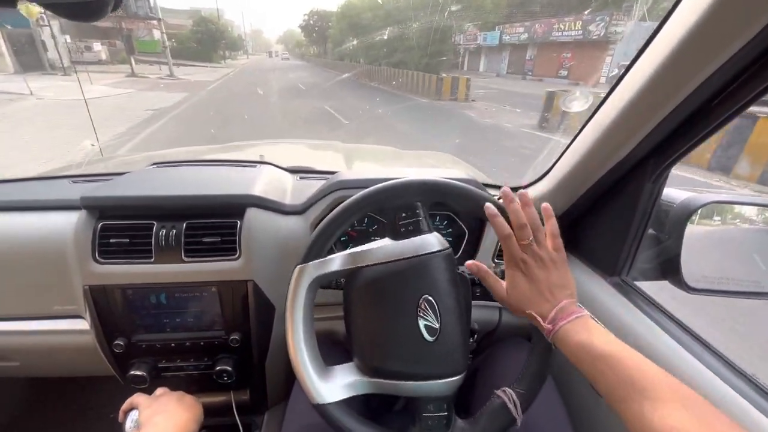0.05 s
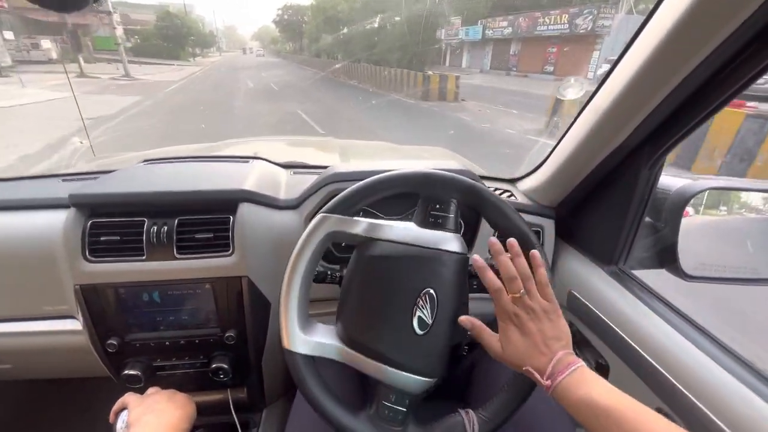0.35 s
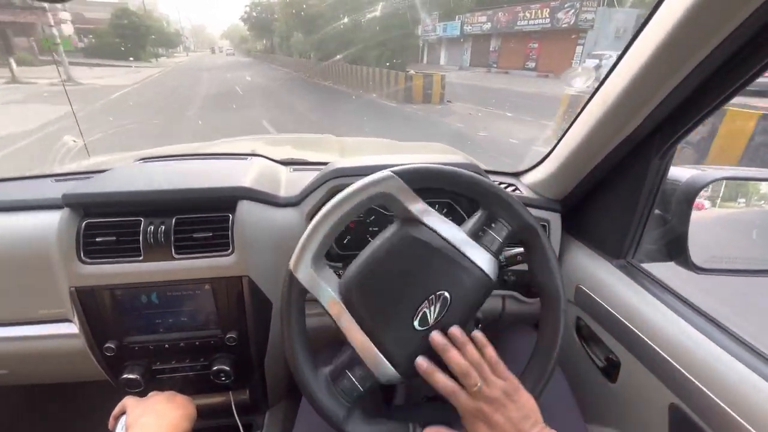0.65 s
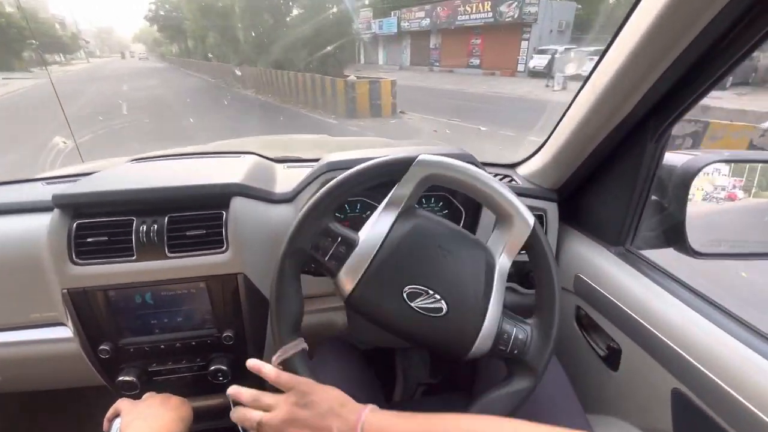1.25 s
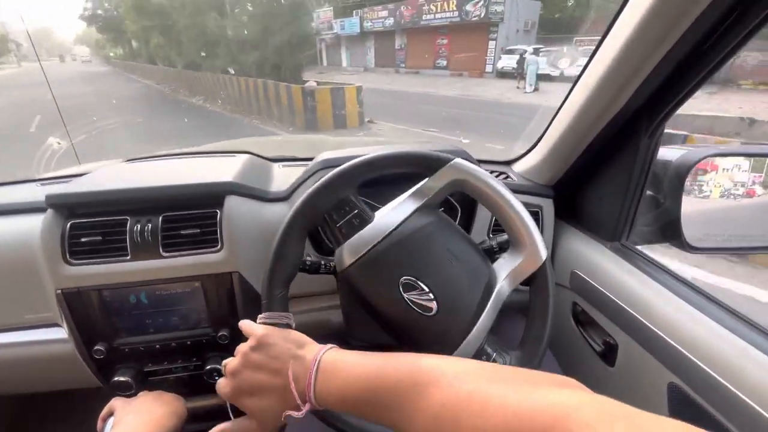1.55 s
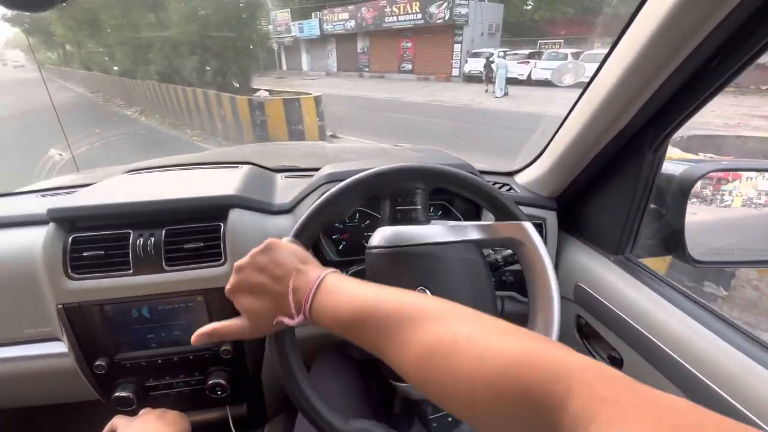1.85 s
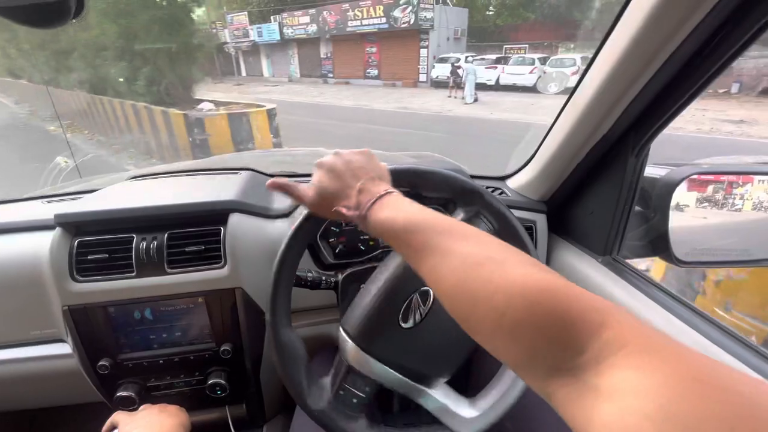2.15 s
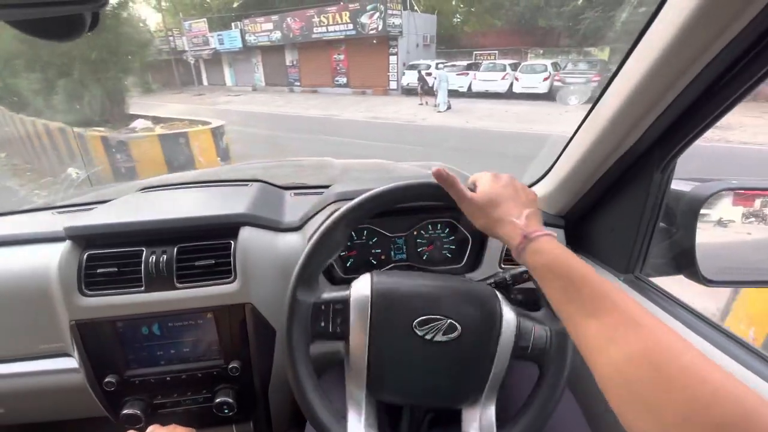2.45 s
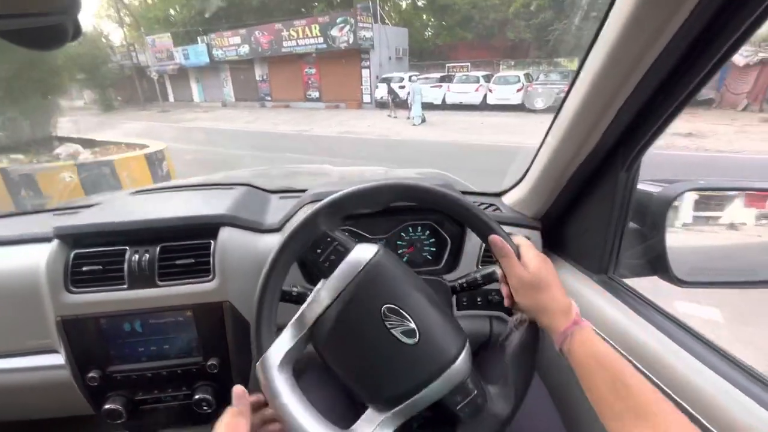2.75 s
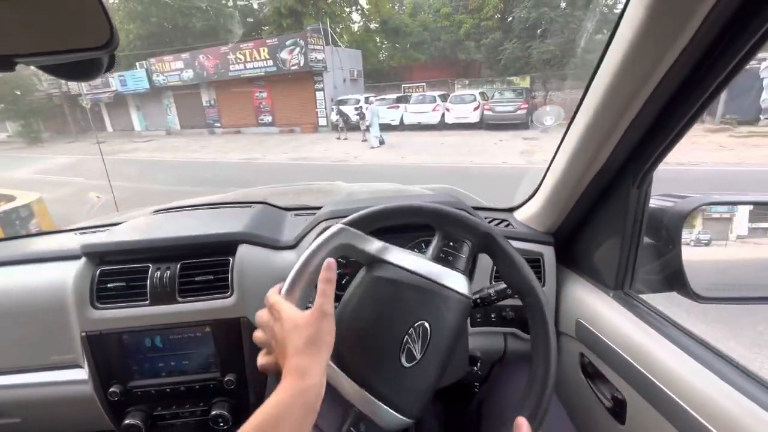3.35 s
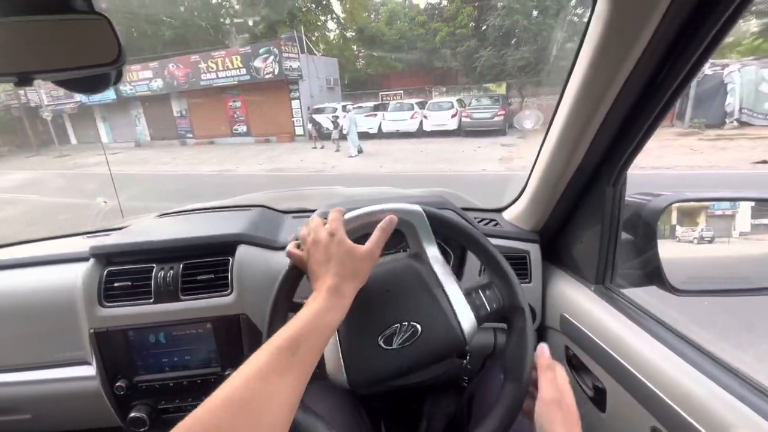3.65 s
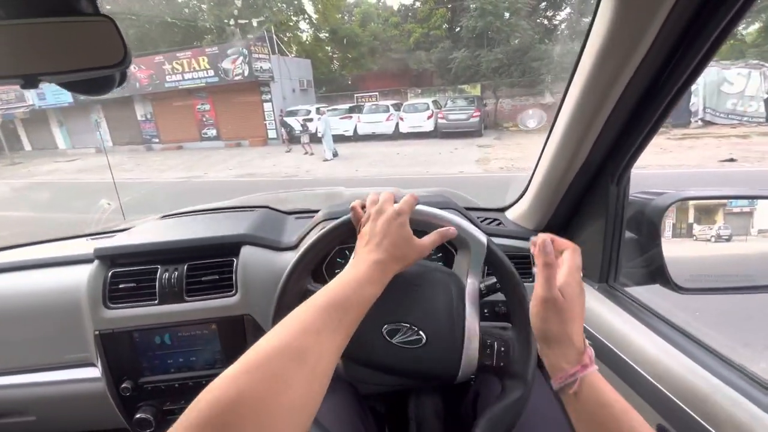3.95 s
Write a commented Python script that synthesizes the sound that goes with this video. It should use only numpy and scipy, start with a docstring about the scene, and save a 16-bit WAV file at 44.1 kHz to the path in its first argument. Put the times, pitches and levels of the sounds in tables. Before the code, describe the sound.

Inside a slowing car, the engine's deep hum drops in pitch and settles near idle while the road rumbles on. A few clicks, dull knocks and faint hand rubs come from the steering wheel, over a soft air hiss.

```python
"""An engine booms, heard from inside a car that slows for a turn. It sinks to idle and picks up slightly.
Its firing makes a stack of tones that ring in the cabin, over the rumble and roar of the road.
Palms rub on the steering wheel, something hard clicks against it, and a few soft knocks ring the trim.
Behind it all, air hisses on the right and a faint whirr swells through the turn."""
import sys
import numpy as np
from scipy import signal
from scipy.fft import rfft, irfft
from scipy.io import wavfile

SR = 44100
rng = np.random.default_rng(int(sys.argv[2]) if len(sys.argv) > 2 else 0)


def dump_mix(stems):
    """Bounce the given channels to the path in sys.argv[1] as a 16-bit WAV at rate SR."""
    frames = np.atleast_2d(stems).T  # one column per channel
    limited = np.clip(frames, -1, 1)  # hard clip at full scale
    pcm = np.round(limited * 32767).astype(np.int16)
    wavfile.write(sys.argv[1], SR, pcm)


N = 176400
T, HZ = np.arange(N) / SR, np.arange(N // 2 + 1) * SR / N
CUTOFF_HZ = 15800

# Engine speed. Each row: time in seconds, firings per second.
FIRING_RATE = [(0, 63.05), (.27, 63.24), (.52, 62.04), (.68, 58.88), (.8, 54.4), (.95, 48.54), (1.1, 42.4),
               (1.23, 38.44), (1.5, 35.38), (1.75, 29.44), (1.95, 26.51), (2.5, 26.53), (2.75, 29.32),
               (3.1, 29.22), (3.5, 28.97), (3.7, 27.86), (4, 28.37)]
# Loudness of the low boom, the boom an octave up, and the rest. Each row: time in seconds, level in dB.
LOW_BOOM = [(0, -32.5), (.14, -23.5), (.28, -30), (.36, -24.5), (.44, -27), (.54, -22.5), (.68, -22.5),
            (.8, -29.5), (.88, -35.5), (.97, -25), (1.15, -39), (1.28, -42), (1.5, -43), (2.9, -50),
            (3.05, -42), (3.5, -62), (4, -72)]
HIGH_BOOM = [(0, -36), (.11, -33), (.33, -34), (.45, -55.5), (.53, -30.5), (.61, -52), (.73, -30.5),
             (.9, -39.5), (1.1, -59), (1.57, -38), (1.8, -53), (1.97, -31.5), (2.3, -40), (2.5, -38.5),
             (2.82, -32), (3.15, -37), (3.5, -34.5), (4, -36.5)]
OTHER_TONES = [(0, -38), (.2, -37.5), (.45, -34), (.75, -43), (1.0, -40.5), (1.23, -38.5), (1.5, -47.5),
               (1.8, -45), (2.3, -41.5), (2.7, -43.5), (3.1, -45), (3.38, -38.5), (4, -42)]
# How the cabin colours those other tones. Each row: pitch in Hz, boost in dB.
CABIN_BOOST = [(30, -21.5), (60, -2), (86, 0.5), (98, 0.5), (113, 4), (130, 3), (150, -11), (180, -4),
               (200, -14), (218, 1.5), (235, -14), (252, -2.5), (280, -25.5), (380, -18.5), (500, -22.5)]

def engine(firing_hz, phase):
    """Firing cylinders make two booms, and weaker tones that glide through the cabin's resonances."""
    out, others_db = 0, in_time(OTHER_TONES)
    booms = {1: LOW_BOOM, 2: HIGH_BOOM}
    octave_db, halfway_db = -4, -7.5
    for multiple in np.arange(1, 21) / 2:
        if multiple in booms:
            db = in_time(booms[multiple]) + 2 * drift(32)
        else:
            db = others_db + at_hz(CABIN_BOOST, multiple * firing_hz) + 4.5 * drift(5.3)
            db += octave_db * np.log2(multiple)
            db += halfway_db * (multiple % 1 > 0)  # uneven cylinders give the in-between tones
        tone = np.sqrt(2) * np.sin(multiple * phase + rng.uniform(0, 2 * np.pi))
        out = out + from_db(db) * tone
    return out * pan(-1.1)


# The rumble's loudness. Each row: time in seconds, level in dB.
RUMBLE_LOUDNESS = [(0, -34), (.5, -39.5), (.85, -36), (1.0, -31.5), (1.22, -37.5), (1.42, -30),
                   (1.65, -36.5), (1.8, -40), (2.08, -36), (2.3, -34), (2.6, -45), (3.05, -35.5),
                   (3.3, -42), (4, -36.5)]
# Its colour. Each row: pitch in Hz, relative level in dB.
RUMBLE_COLOUR = [(10, -37), (19, -43.5), (27, -17), (40, 8.5), (54, 15), (78, 20), (95, 4.5), (110, 11),
                 (135, 7), (170, -20.5), (300, -62.5)]

def road_rumble():
    """The rolling wheels make a deep rumble."""
    return cabin_noise(RUMBLE_COLOUR, pan_db=-1.6) * from_db(in_time(RUMBLE_LOUDNESS))


# Hard taps. Each row: start in seconds, level in dB, brightest pitch in Hz, sharpness (Q), pan in dB.
WHEEL_CLICKS = [(.184, -49, 7400, 5, -8), (0.9155, -24.5, 8150, 3, -2.5), (0.9163, -29, 4140, 4, -10),
                (.9198, -30.5, 6100, 2.1, -11), (1.6925, -37.5, 7004, 14, -10), (1.693, -41, 4242, 5, -12),
                (2.3675, -38.5, 14570, 2.77, -1), (2.3666, -34, 2250, 2.4, -3),
                (3.561, -17.5, 1187, 10.5, -2), (3.575, -44.5, 5864, 1.85, -5), (3.674, -49, 4200, 5.6, -2),
                (3.9189, -34, 2530, 6, -8)]
# Their ring. Each row: pitch in Hz, level in dB, fade time in seconds.
RING_TONES = [(2859, -17, .05), (3520, -4, .035), (3750, -5, .035), (4194, -3, .055), (4480, -3, .055),
              (5200, -7, .035), (5900, -5, .05), (6400, -6, .04), (6595, -5, .045), (7181, -11, .055),
              (8150, -3, .05), (8600, -8, .055)]
# The colour of their noise. Each row: pitch in Hz, boost in dB.
SPRAY_COLOUR = [(300, 2), (1500, -5), (2700, -11), (3600, -12), (5300, -17), (8800, -18.5), (10000, -17.5),
                (16000, -20)]

def clicks():
    """Something hard hits the wheel: a crack, a short ring and a spray of cabin echoes."""
    out, size = np.zeros((2, N)), SR // 5
    t, bin_hz = T[:size], np.arange(size // 2 + 1) * SR / size
    colour = from_db(at_hz(SPRAY_COLOUR, bin_hz))
    crack, echoes = from_db(5) * dying(t, .016), dying(t, .1)
    for start, db, bright_hz, q, pan_db in WHEEL_CLICKS:
        spray = irfft(rfft(rng.standard_normal((2, size))) * colour, size)
        hit = spray * (crack + echoes)
        for hz, ring_db, fade_s in RING_TONES:
            tone = np.sin(2 * np.pi * (hz * t + rng.random((2, 1))))
            hit += from_db(ring_db - 13.5) * dying(t, fade_s) * tone
        top_hz = min(1.9 * bright_hz, CUTOFF_HZ)
        hit = signal.lfilter(*signal.butter(2, top_hz, fs=SR), hit)
        peak = signal.lfilter(*signal.iirpeak(bright_hz, q, fs=SR), hit)
        add(out, start, (peak + from_db(-18.5) * hit) * from_db(db) * pan(pan_db))
    return out


# Soft blows. Each row: start in seconds, level in dB, boost of the upper tones in dB, pitch factor.
SOFT_KNOCKS = [(0.921, -49, -15, 1), (2.886, -29.5, -6, 1.03), (3.5257, -22.5, -2, 0.98),
               (3.5594, -29, -5, 1.056), (3.566, -23, -13, 0.917), (3.807, -31.5, 5, 1)]
# The trim's ring. Each row: pitch in Hz, level in dB, fade time in seconds.
TRIM_TONES = [(151, -10.5, 0.048), (184.5, -1, 0.11), (249, -6, 0.11), (385, -18, 0.077), (616, -27, .04),
              (820, -20, 0.036), (1127, -34, 0.031), (1280, -17, 0.045)]

def knocks():
    """Dull blows make the cabin trim ring briefly."""
    out, t = np.zeros((2, N)), T[:SR // 4]
    attack, upper_hz = 1 - dying(t, .0041), 600
    for start, db, upper_db, pitch in SOFT_KNOCKS:
        for hz, tone_db, fade_s in TRIM_TONES:
            side_shift = np.array([[.5], [-.5]]) * at_hz(LEFT_LEAD, hz)
            tone = np.sin(2 * np.pi * pitch * hz * t + side_shift)
            gain = from_db(db + tone_db + upper_db * (hz > upper_hz))
            add(out, start, gain * tone * attack * dying(t, fade_s))
    return out


# Loudness of the drone and the roar. Each row: time in seconds, level in dB.
DRONE_LOUDNESS = [(0, -41), (.25, -43.5), (.47, -39), (.7, -42.5), (1.0, -38.5), (1.17, -46), (1.35, -41.5),
                  (1.7, -42), (2.1, -41), (2.35, -43), (2.85, -42), (3.2, -44), (3.7, -42.5), (4, -43.5)]
ROAR_LOUDNESS = [(0, -50.5), (.25, -49.5), (.45, -47.5), (.7, -50), (.95, -49), (1.2, -48.5), (1.45, -50.5),
                 (1.6, -47), (1.8, -50.5), (2.0, -49), (2.35, -50.5), (2.6, -49.5), (2.85, -47.5),
                 (3.08, -51), (3.5, -49.5), (4, -49)]
# Their colours. Each row: pitch in Hz, relative level in dB.
DRONE_COLOUR = [(40, -66), (90, -3), (130, 0), (180, 2), (220, -2.5), (290, 0.5), (370, 0), (450, -4),
                (560, -13.5), (800, -21), (2000, -74.5)]
ROAR_COLOUR = [(150, -30.5), (350, -9.5), (480, -4.5), (530, 2.5), (640, 1), (720, -2.5), (800, -3),
               (860, -2), (1030, -5.5), (1130, 0), (1350, -8.5), (1560, -4.5), (1800, -12), (2100, -15.5),
               (3000, -23), (4000, -26.5), (5000, -41), (9000, -35.5), (11000, -45), (16000, -77)]
# Which side they lean to. Each row: pitch in Hz, pan in dB.
BODY_PAN = [(150, -12.5), (240, -2.5), (330, 1.5), (420, 1), (550, -3), (700, -2.5), (950, 1), (1500, 2.5),
            (2000, -2), (2500, 2.5)]

def body_noise(phase):
    """Panels drone, and tyre and engine noise roars through them. Both pulse lightly with the firing."""
    pan_db = at_hz(BODY_PAN, HZ)
    drone = cabin_noise(DRONE_COLOUR, pan_db) * from_db(in_time(DRONE_LOUDNESS))
    roar = cabin_noise(ROAR_COLOUR, pan_db) * from_db(in_time(ROAR_LOUDNESS) + .9 * drift(4.5))
    return (drone + roar) * (1 + .11 * np.cos(phase))


# Hand movements. Each row: start and length in seconds, level in dB, then the squeak's
# first and last pitch in Hz, its boost in dB and its sharpness (Q).
PALM_SLIDES = [(0.204, 0.33, -70, 9200, 9000, 9.5, 21), (1.081, 0.27, -64, 620, 650, 14, 3.3),
               (1.528, 0.16, -66, 4700, 5000, 8.5, 13), (1.798, 0.32, -73, 9500, 9790, 9, 14),
               (2.41, 0.3, -62.5, 3300, 4400, -12, 4), (2.544, 0.085, -70, 10010, 9785, 10, 4.13),
               (2.623, 0.33, -64, 3301, 3300, -14, 3.75), (2.75, 0.14, -79, 5300, 5936, 18, 11),
               (2.756, 0.19, -79.5, 630, 627, 36.5, 1.7), (2.882, 0.3, -67, 6300, 6600, -5, 3.17),
               (3.399, 0.18, -74, 8000, 8000, 5, 2.6), (3.683, 0.1, -67, 5600, 5600, -17, 2.98)]
# The colour of the rubbing. Each row: pitch in Hz, relative level in dB.
RUB_COLOUR = [(500, -14), (2000, 3.5), (2600, -8), (3300, -0.5), (4300, 1.5), (5700, 0), (6800, -5.5),
              (9000, -7.5), (10500, -16.5), (12500, -45), (16000, -31.5)]

def slides():
    """Palms rub the wheel: grainy noise swells and fades, with a faint squeak or a low groan."""
    out = np.zeros((2, N))
    friction = cabin_noise(RUB_COLOUR, pan_db=-13) * from_db(drift(57))
    for start, length, db, start_hz, end_hz, squeak_db, q in PALM_SLIDES:
        rub = friction[:, int(start * SR):int((start + length) * SR)]
        squeak = gliding_resonance(rub, start_hz, end_hz, q)
        swell = np.sqrt(np.abs(np.sin(np.linspace(0, np.pi, rub.shape[1]))))
        add(out, start, from_db(db) * swell * (rub + from_db(squeak_db) * squeak))
    return out


# The whirr's loudness. Each row: time in seconds, level in dB.
WHIRR_LOUDNESS = [(0, -58), (.8, -60), (1.25, -55.5), (2.0, -54.5), (2.7, -57.5), (3.3, -57.5), (3.7, -62),
                  (4, -71)]
# Its colour. Each row: pitch in Hz, relative level in dB.
WHIRR_COLOUR = [(700, -30), (850, -3), (925, 2.5), (1000, -4), (1200, -44)]

def whirr():
    """A narrow band of noise, perhaps the steering pump, is strongest through the turn."""
    return cabin_noise(WHIRR_COLOUR, pan_db=2) * from_db(in_time(WHIRR_LOUDNESS))


# The colour of the hiss. Each row: pitch in Hz, relative level in dB.
AIR_COLOUR = [(900, 3), (1800, 4), (2400, 2.5), (3300, 3), (3800, 2), (4200, 4.5), (4600, 1.5), (5200, 0),
              (6500, -6), (9200, -15), (10500, -25), (12500, -48), (16000, -51)]

def air():
    """Air hisses steadily on the right, probably from a vent."""
    return cabin_noise(AIR_COLOUR, pan_db=-11) * from_db(-60.5 + .5 * drift(27))


# How alike the two sides sound. Each row: pitch in Hz, likeness from 0 to 1.
SIDE_LIKENESS = [(30, 0.84), (60, 0.86), (130, 0.75), (190, 0.51), (230, .15), (320, 0.71), (410, .7),
                 (490, .1), (600, 0.75), (770, 0.63), (840, 0.09), (1020, .1), (1130, 0.82), (1350, 0.44),
                 (1600, 0.65), (1850, 0.34), (2100, 0.23), (4000, 0.083), (16000, .05)]
# How far the left wave runs ahead of the right. Each row: pitch in Hz, lead in radians.
LEFT_LEAD = [(200, 0.28), (260, 2.53), (340, 1.5), (410, 0.85), (470, 1.57), (510, 4), (600, 3.5),
             (790, 3.5), (1000, 0.9), (1130, 1.9), (1220, 2.5), (1450, 2), (1550, 2), (1900, 2.5),
             (2100, 1.56)]

def cabin_noise(colour, pan_db):
    """Stereo noise of strength 1, alike on both sides in the bass and spread out in the treble."""
    left, other = rfft(rng.standard_normal((2, N)))
    alike = at_hz(SIDE_LIKENESS, HZ)
    right = alike * left + np.sqrt(1 - alike ** 2) * other
    right *= np.exp(-1j * at_hz(LEFT_LEAD, HZ))
    spectrum = np.array([left, right]) * from_db(at_hz(colour, HZ)) * pan(pan_db)
    return rms_one(irfft(spectrum, N))


def gliding_resonance(x, start_hz, end_hz, q, size=128):
    """Pick out one gliding pitch, block by block. A higher q makes it narrower."""
    out, state = np.zeros_like(x), np.zeros((2, 2))
    for i in range(0, x.shape[1], size):
        hz = start_hz + (end_hz - start_hz) * i / x.shape[1]
        peak = signal.iirpeak(hz, q, fs=SR)
        out[:, i:i + size], state = signal.lfilter(*peak, x[:, i:i + size], zi=state)
    return out


def from_db(db):
    """Turn decibels into a gain."""
    return 10 ** (np.asarray(db) / 20)


def rms_one(x):
    """Scale to an average strength (rms) of 1."""
    return x / np.sqrt(np.mean(x ** 2) + 1e-20)


def in_time(rows):
    """Read a table at every sample."""
    return np.interp(T, *np.transpose(rows))


def at_hz(rows, hz):
    """Read a table by pitch, with octaves evenly spaced."""
    pitches, values = np.transpose(rows)
    return np.interp(np.log(hz + 1e-9), np.log(pitches), values)


def pan(db):
    """Left and right gains: plus leans left, minus leans right."""
    return from_db(np.array([[.5], [-.5]]) * db)


def drift(rate_hz):
    """A random wobble of strength 1, mostly slower than rate_hz."""
    return rms_one(irfft(rfft(rng.standard_normal(N)) / (1 + (HZ / rate_hz) ** 2), N))


def dying(t, fade_s):
    """Fade by 60 dB in fade_s seconds."""
    return np.exp(-np.log(1000) * t / fade_s)


def add(out, start, sound):
    """Mix in a short sound at a start time in seconds."""
    i = int(start * SR)
    out[:, i:i + sound.shape[-1]] += sound[..., :N - i]


def scene():
    """Everything heard from the driver's seat."""
    firing_hz = in_time(FIRING_RATE) * (1 + .0017 * drift(8.6))
    phase = 2 * np.pi * np.cumsum(firing_hz) / SR
    driving = engine(firing_hz, phase) + road_rumble() + body_noise(phase)
    return driving + air() + slides() + clicks() + knocks() + whirr()


def record(dry):
    """Cut the highest treble steeply."""
    return signal.sosfilt(signal.ellip(10, .1, 80, CUTOFF_HZ, fs=SR, output="sos"), dry)


dry = scene()
out = record(dry)
dump_mix(out)
```